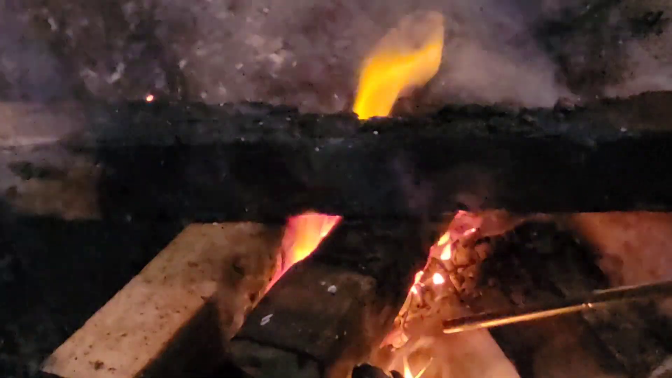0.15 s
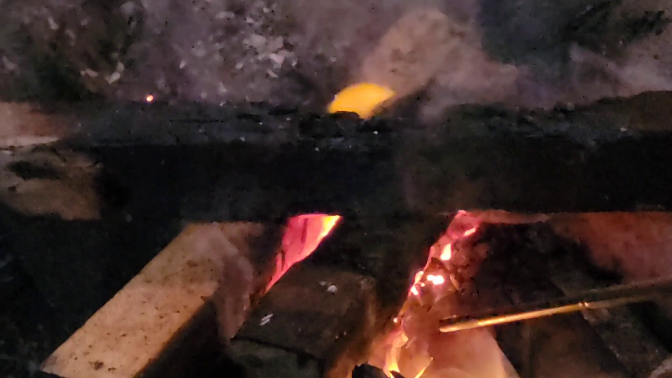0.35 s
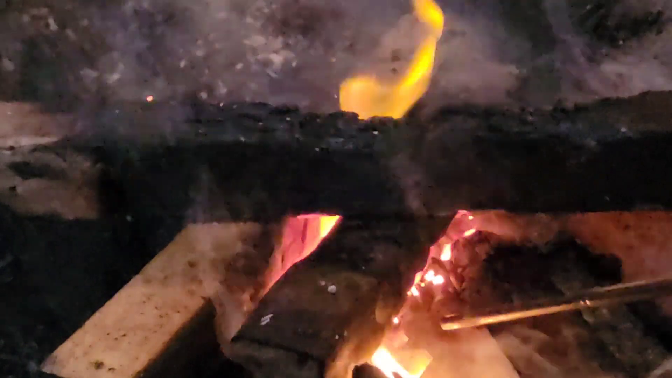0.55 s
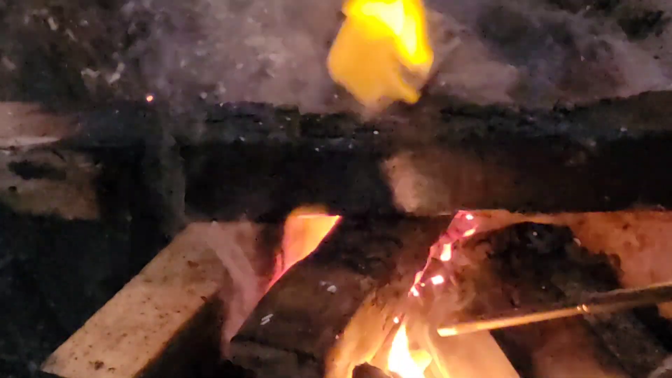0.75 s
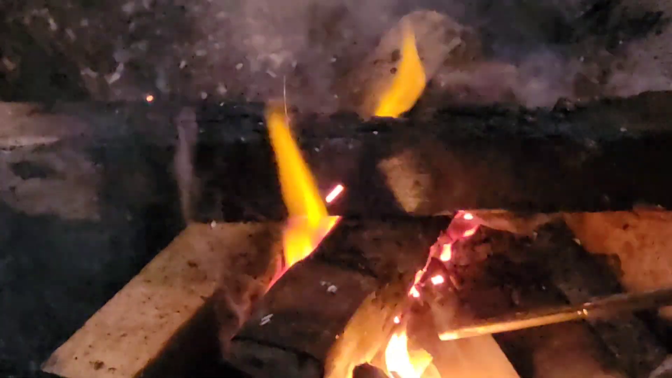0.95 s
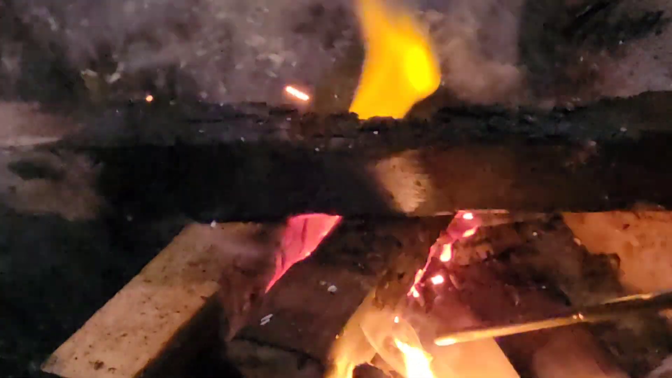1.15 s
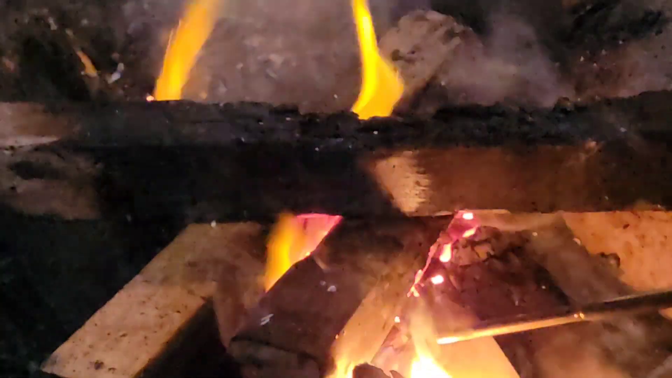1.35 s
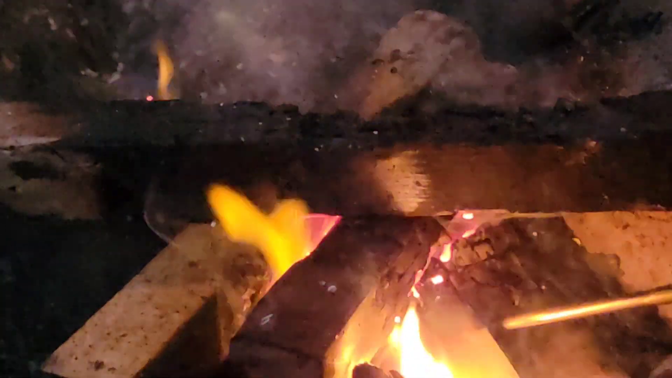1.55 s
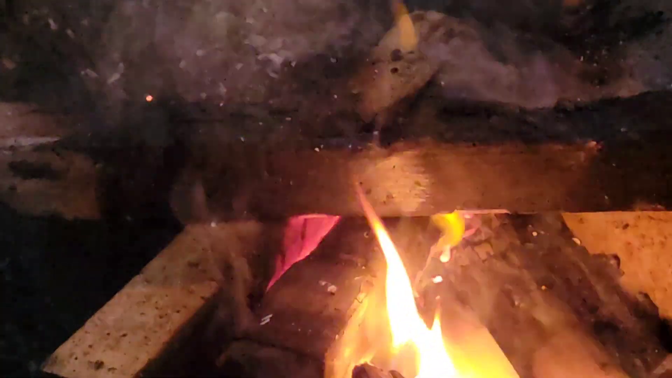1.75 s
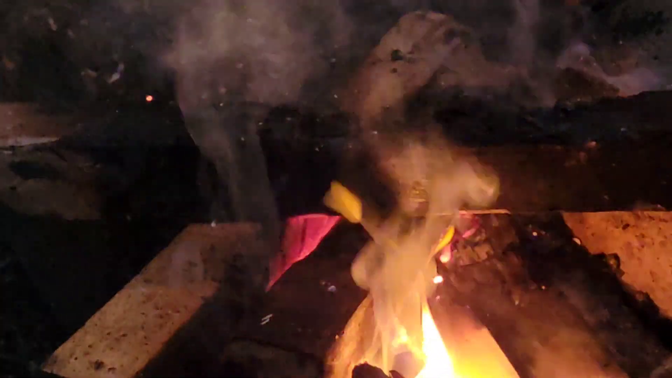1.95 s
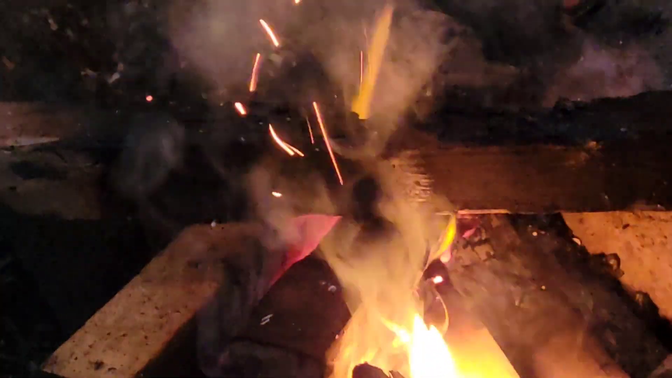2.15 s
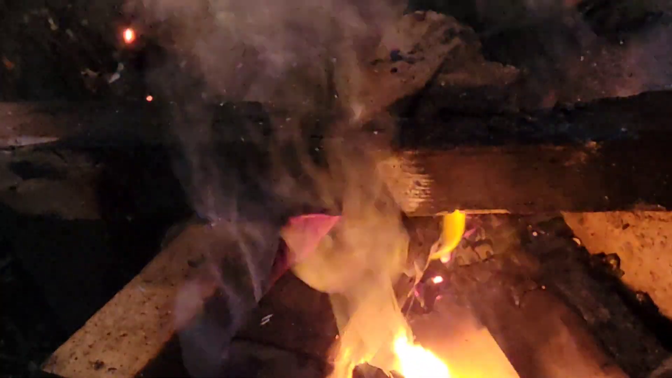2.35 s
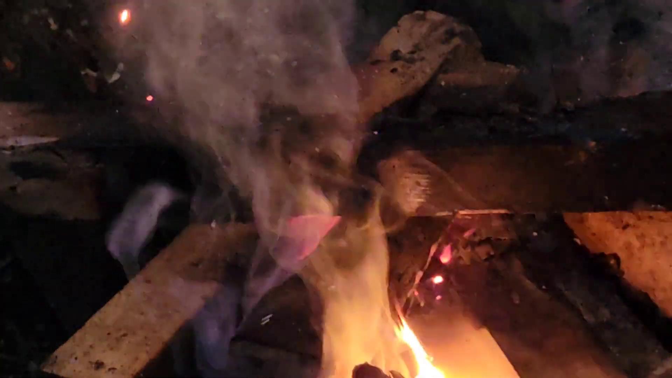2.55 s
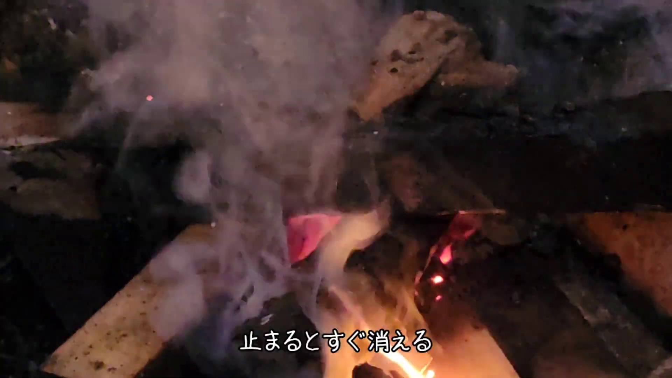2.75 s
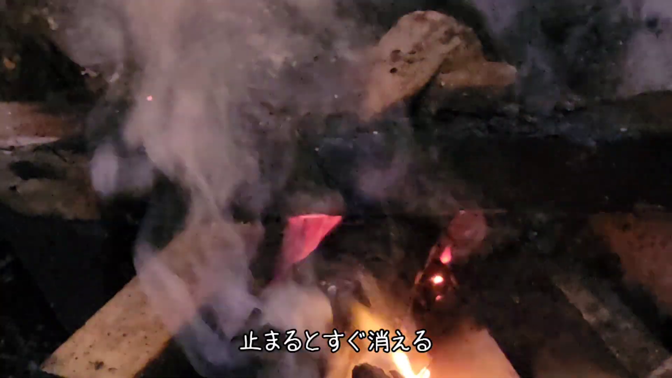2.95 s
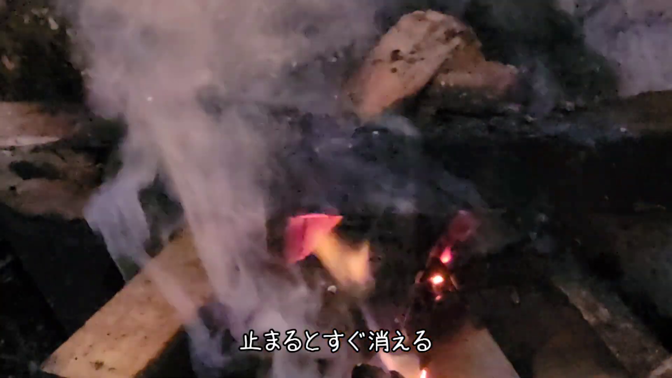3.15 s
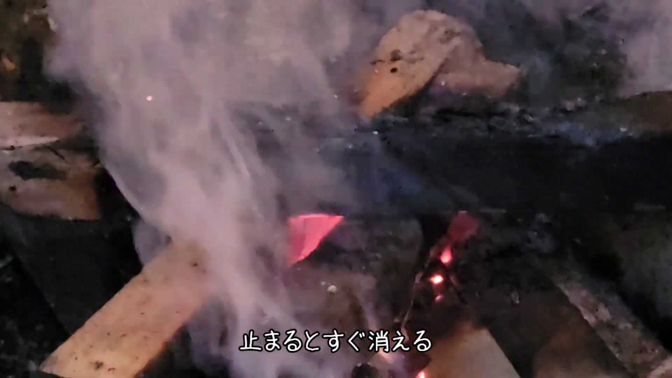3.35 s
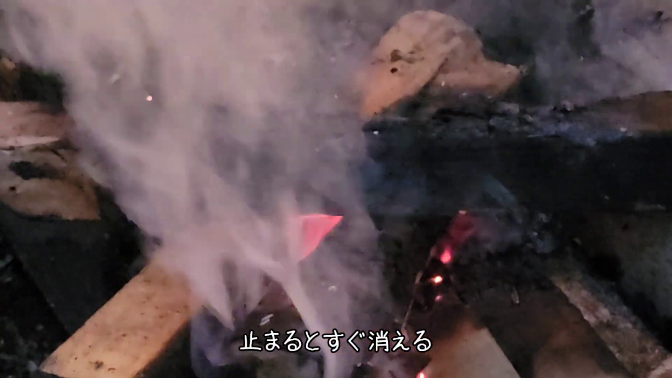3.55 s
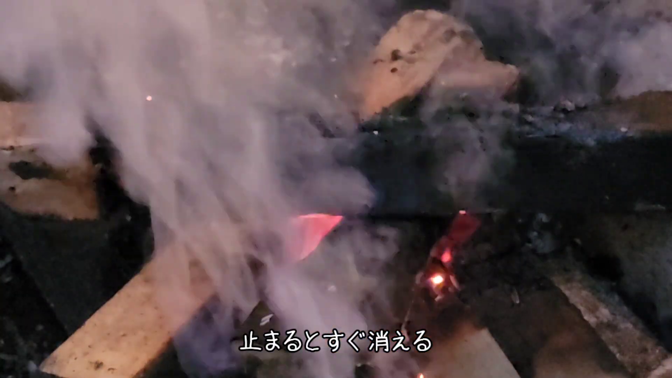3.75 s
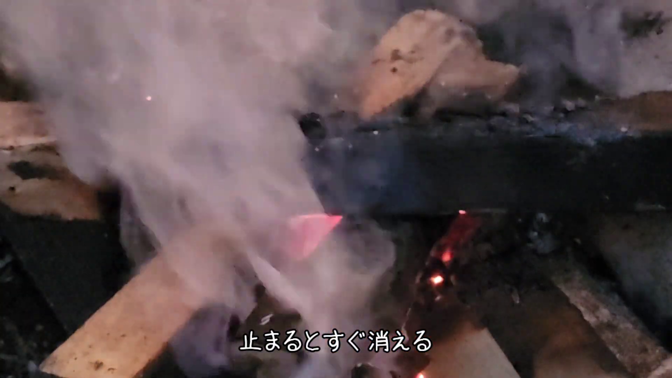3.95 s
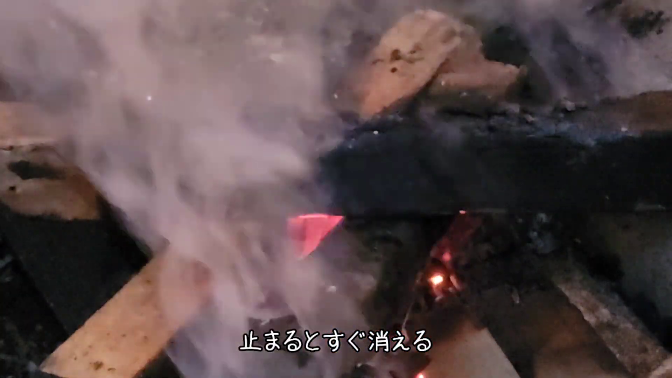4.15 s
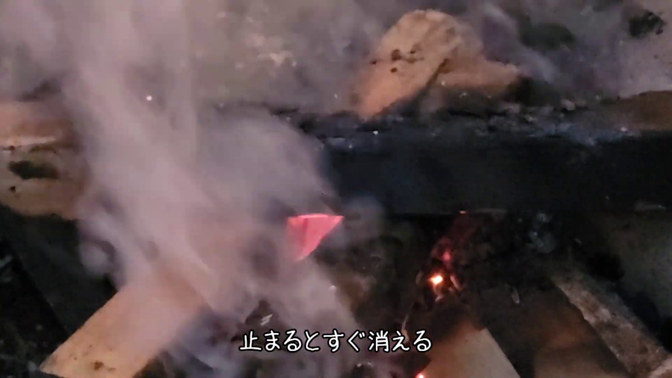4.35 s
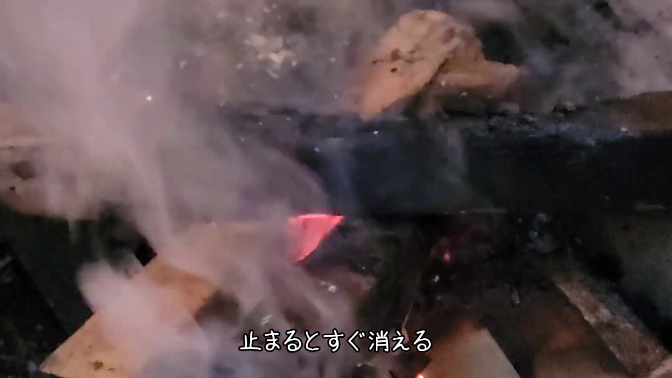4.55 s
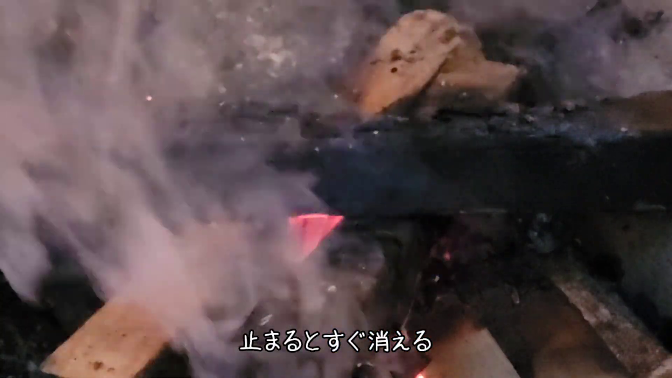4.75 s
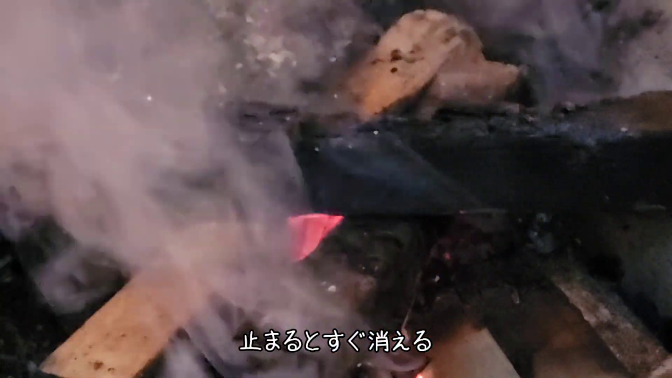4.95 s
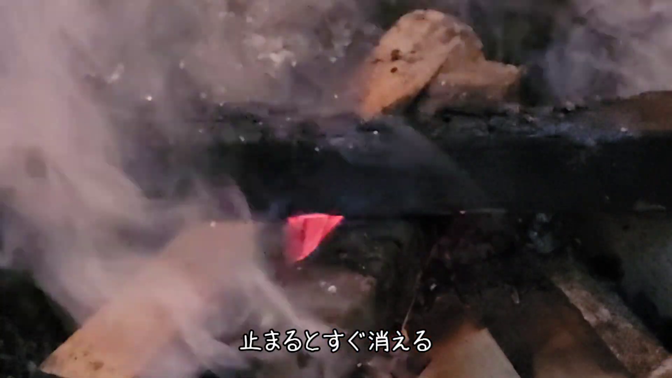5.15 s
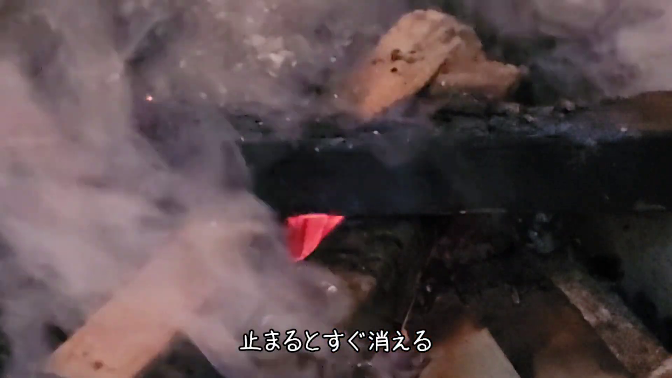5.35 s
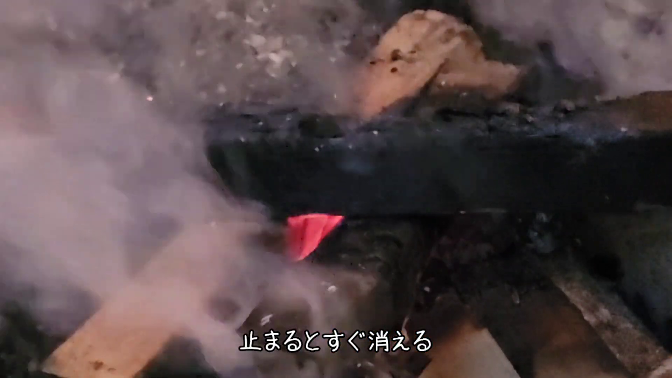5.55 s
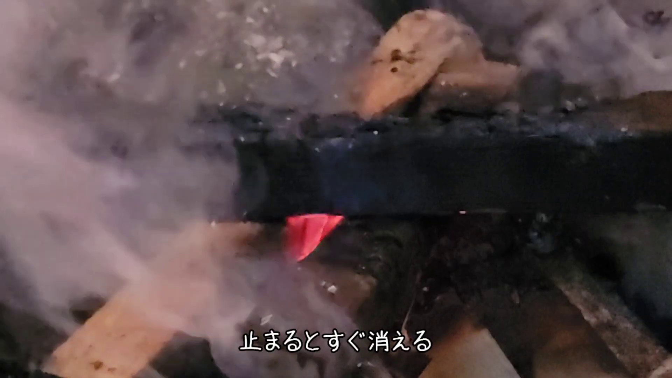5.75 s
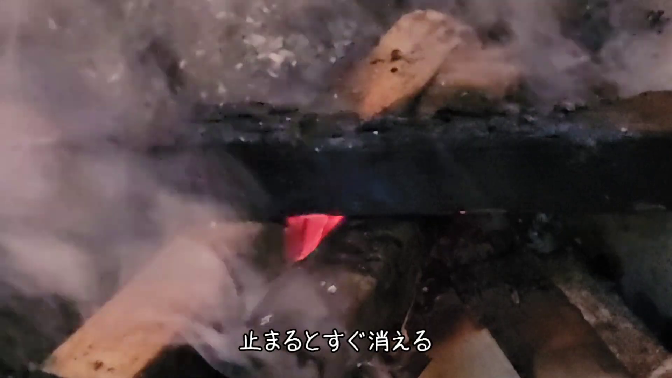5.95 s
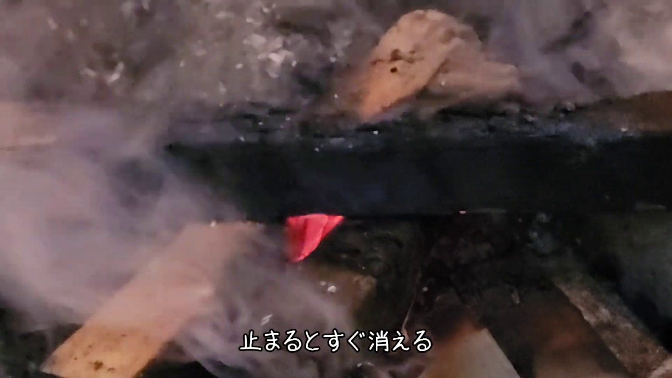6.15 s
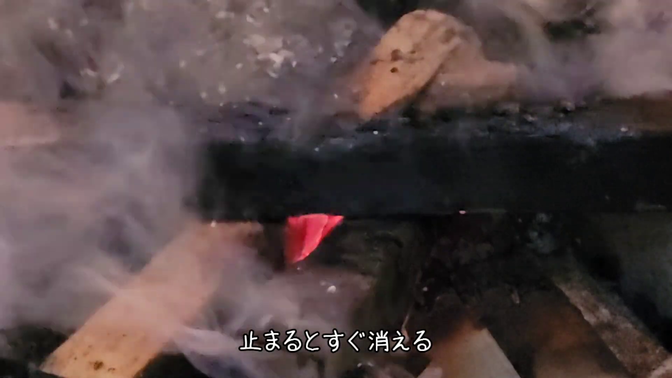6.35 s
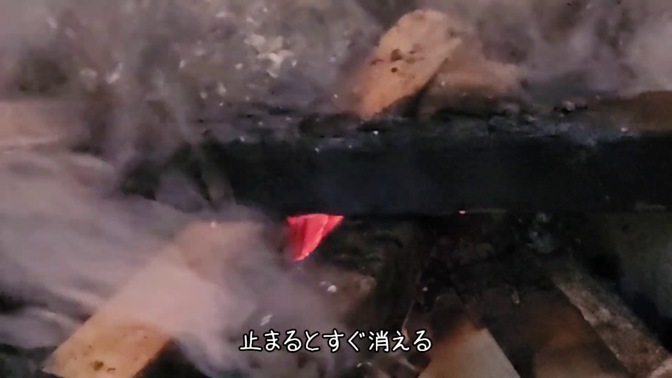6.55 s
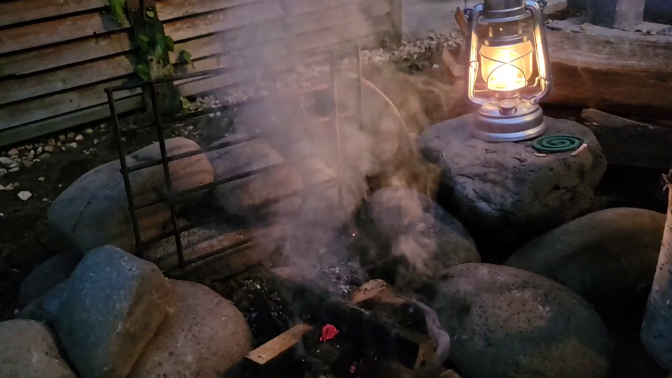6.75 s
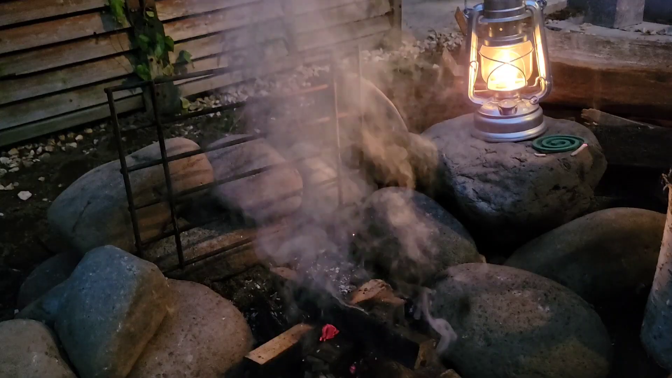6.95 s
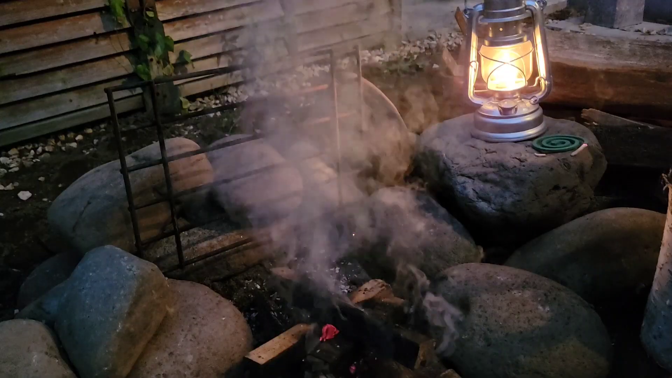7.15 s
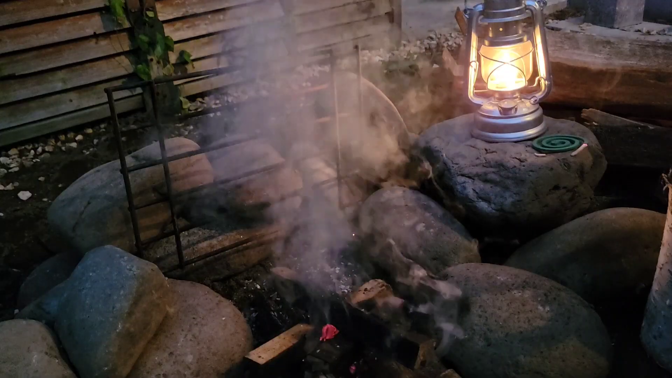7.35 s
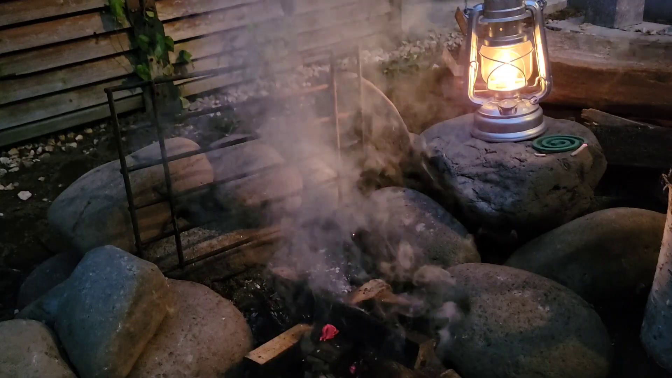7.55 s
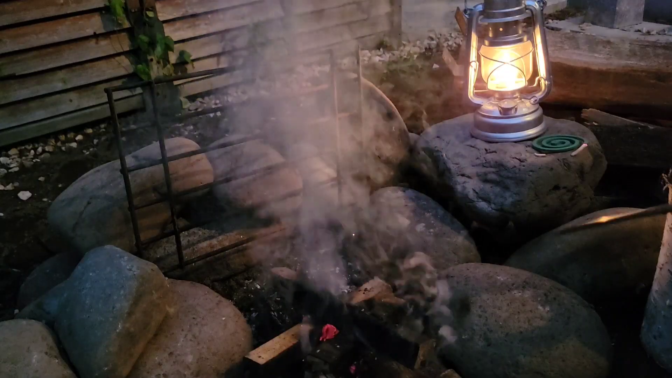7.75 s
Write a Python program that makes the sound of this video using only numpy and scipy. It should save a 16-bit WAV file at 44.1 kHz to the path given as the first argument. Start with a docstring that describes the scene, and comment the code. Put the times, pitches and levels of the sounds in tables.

```python
"""A stone hearth in a yard on a summer night: a small wood fire in front of the microphones, insects all round.
Fanned through a blowpipe, the flames are patchy low noise that flutters, flares up and sinks to a smoulder.
Logs knock, embers tick as ringing splits, and three loud pops are spikes with a rattle and an answer from the yard.
A field cricket chirps close by in sagging pure notes; others and a bush cricket's noisy rasp are farther off.
Near the end the low rumble drops away and the metal pipe scrapes briefly, ringing its resonances."""
import sys
import numpy as np
from scipy import signal
from scipy.fft import rfft, irfft, next_fast_len
from scipy.io import wavfile
from scipy.ndimage import uniform_filter1d, map_coordinates

SR = 44100
rng = np.random.default_rng(int(sys.argv[2]) if len(sys.argv) > 2 else 0)


def file_out(sig):
    """Save sig as 16-bit WAV at sys.argv[1]."""
    # one column per channel
    cols = np.atleast_2d(sig).T
    # limit, then scale
    lim = np.clip(cols, -1, 1)
    pcm = np.round(lim * 32767).astype(np.int16)
    wavfile.write(sys.argv[1], SR, pcm)


N = 343539

# How strongly the fire burns. Each row: time in seconds, level over a smoulder in dB.
BLAZE = [(0, 2.5), (.35, 4.5), (.7, 4), (1.1, 3.5), (1.42, 5.5), (1.7, 1.5), (2.8, 2)]
# Flare-ups as fresh air feeds the flames. Each row: centre in seconds, level in dB, half-length in seconds.
FLARES = [(0.058, -47.5, 0.043), (0.25, -51, 0.16), (0.943, -46, 0.053), (1.286, -48, 0.1),
          (1.494, -41, 0.064)]
# Loud pops. Each row: start in seconds, level in dB, t60 of the rattle among the logs in seconds,
# yard echo gain in dB, left-right level difference in dB.
POPS = [(0.8355, -15, 0.0091, -22, -1), (1.9796, -13.5, 0.012, -13.5, -0.5), (5.1343, -21, 0.012, -24.5, 0)]
# The colour of each pop, one list per pop. Each row: frequency in Hz, relative level in dB.
POP_COLOURS = [
    [(80, -9), (240, 3), (420, -7), (750, -6), (1300, -3), (1700, -2), (2050, -11), (3000, -3.5),
     (4200, -1), (5200, -5.5), (6200, -3.5), (9800, -13), (12000, -5), (15500, -11.5)],
    [(80, -9), (240, 5.5), (440, -6), (850, -6), (1180, 2.5), (1600, -0.5), (1900, -3.5), (2500, 0),
     (3500, -1.5), (4300, -8.5), (5600, -4.5), (7500, -14.5), (12500, -11.5), (15500, -17)],
    [(80, -17), (200, 2), (460, -11), (950, -8.5), (1300, 1), (1750, -1), (2080, -24), (2750, -0.5),
     (3700, -0.5), (4500, -14), (5300, -14.5), (7300, -9), (8500, -12.5), (11000, -22.5)],
]
# The clearest ticks: the embers, and at 7.437 s the click of the blowpipe closing. Each row: start in seconds,
# peak in dB before echo and pan, pitch in Hz.
TICKS = [(.618, -27.5, 9850), (.955, -35.5, 10500), (1.2508, -32.5, 2200), (1.2516, -29, 7850),
         (1.398, -40, 8800), (2.028, -42, 6000), (2.888, -42, 9200), (4.1833, -35, 6200),
         (4.213, -40, 2470), (7.437, -38, 4100)]
# Dull knocks of shifting wood. Each row: start in seconds, starting level in dB, t60 in seconds.
WOOD_KNOCKS = [(1.754, -37.5, 0.066), (2.535, -40.5, 0.23), (2.555, -42, 0.086)]
# Resonances of the metal blowpipe. Each row: frequency in Hz, width in Hz, relative level in dB.
PIPE_MODES = [(2170, 120, -9), (2740, 35, -3), (3486, 34, 4), (3700, 120, -8), (4270, 21, 5), (5012, 25, 2),
              (5550, 22, 5.5), (6400, 65, -13), (7820, 120, -7), (10700, 900, -27)]

# Runs of evenly spaced cricket chirps: the near one, a lower one farther off, a higher one.
# Each row: start in seconds, chirps, period in seconds, syllables, first level in dB, dB gained per chirp;
# the near cricket is later mixed 3.5 dB lower.
NEAR_CHIRPS = [(-.025, 7, .319, 5, -44.3, 0.3), (2.25, 5, .322, 4, -40.5, -1),
               (3.815, 7, .322, 4, -45, 0.12), (6.415, 2, .303, 4, -44.3, -3.5)]
LOW_CHIRPS = [(.24, 4, .33, 4, -48.5, -1.6), (2.16, 1, .32, 1, -51.5, 0), (3.15, 7, .312, 3, -52.5, 0),
              (5.66, 1, .32, 4, -56.5, 0), (6.32, 2, .36, 3, -57.5, 9)]
HIGH_CHIRPS = [(6.917, 3, .421, 3, -63.5, 3.5)]
# The bush cricket's runs of evenly spaced bursts. Each row: start in seconds, bursts, period in seconds,
# burst length in seconds, first level in dB before roughness and pan, dB gained per burst.
RASP_BURSTS = [(.13, 3, 0.46, 0.4, -65, 3.5), (1.67, 2, 0.35, 0.27, -62, 2.5),
               (2.3, 5, 0.55, 0.38, -57, -1), (5.55, 4, .42, 0.19, -67.5, -.5)]

# Spectra of flames, flares, wood, insects, rumble, air and hiss, and the colouring of the pops' echo.
# Each row: frequency in Hz, relative level in dB.
FLUTTER_COLOUR = [(70, -40), (130, -3), (200, -1), (290, -3), (400, -8.5), (600, -18), (1500, -43.5)]
FLARE_COLOUR = [(90, -34), (140, -4.5), (180, 3), (240, -2.5), (300, -6.5), (400, -13), (900, -55)]
WOOD_COLOUR = [(80, -39), (220, 6), (400, 2.5), (800, 0), (1300, -18), (3000, -17), (9000, -30.5)]
RASP_COLOUR = [(6000, -34), (9000, 2.5), (11000, 5), (12300, 10), (13400, 8.5), (15200, 4), (16000, 2.5)]
CHORUS_COLOUR = [(4200, -24), (4750, -7.5), (5000, 5.5), (5200, 7.5), (5380, 5.5), (5600, -42), (6200, -51)]
RUMBLE_COLOUR = [(15, -11), (30, -6.5), (45, -2.5), (68, 2), (100, 3), (125, -5), (170, -16), (300, -63)]
AIR_COLOUR = [(250, -19.5), (430, -3), (700, -2.5), (1100, -4.5), (1500, -15), (2500, -28.5)]
HISS_COLOUR = [(700, -32), (1400, 3), (2200, 0.5), (3000, -1), (4000, -8), (5500, -5), (7000, -16.5),
               (8000, -11), (8550, -5.5), (9200, -16), (11000, -19), (15500, -30)]
ECHO_COLOUR = [(100, -6), (300, 2), (700, 5.5), (2500, 8.5), (5000, 9), (9000, 11.5), (15000, 5.5)]
# Likeness of left and right in the noise layers. Each row: frequency in Hz, correlation from -1 to 1.
LIKENESS = [(60, 0.97), (130, 0.97), (290, 0.9), (640, 0.24), (1400, -0.064), (3100, 0.37), (6800, -0.32),
            (15000, 0.14)]
# Dying away of the yard's reflections. Each row: frequency in Hz, t60 in seconds.
YARD_T60 = [(200, 0.24), (2500, 0.27), (6000, 0.26), (14000, 0.18)]

# Levels in dB, each with its drop in dB at the hush; a negative drop is a rise.
SMOULDER_DB, SMOULDER_DROP_DB = -56, 6
CHORUS_DB, CHORUS_DROP_DB = -60.5, 4.5
RUMBLE_DB, RUMBLE_DROP_DB = -49.5, 7
AIR_DB, AIR_DROP_DB = -58, -0.3
HISS_DB, HISS_DROP_DB = -59, 4
HUSH_S, HUSH_FADE_S = 6.94, 0.021  # middle of the fall, and its time constant
RUMBLE_DRIFT_DB, RUMBLE_DRIFT_RATE = -0.15, 3.07  # dB per unit of a tiny chance drift, knots a second
HISS_GROWS, AIR_GROWS, FAINT_GROWS = 0.91, 0.47, 2.2  # dB per dB of blaze
FAINT_DB, FAINT_RANGE_DB = -59.5, 8.5  # weakest chance tick before the blaze lifts it, and the spread above
FAINT_LOW_HZ, FAINT_RANGE_HZ = 8000, 5000  # lowest pitch of the chance ticks, and the spread above
TOP_HZ = 15700  # upper band limit of the recorder


def flames():
    """Turbulent flames flutter in quick lumps and flare up with a soft low whump."""
    t = np.arange(N) / SR
    burn_db = SMOULDER_DB + blaze() - SMOULDER_DROP_DB * hush()
    flutter = gain(1.57 * wobble(22)) * rush(FLUTTER_COLOUR, patchy_db=-0.5)
    burn = gain(burn_db) * unit(flutter)
    swell = sum(gain(db) * np.exp(-((t - s) / half) ** 2) for s, db, half in FLARES)
    return burn + swell * rush(FLARE_COLOUR, patchy_db=-1.5)


def blaze():
    """The strength of the fire at each sample, in dB over a smoulder."""
    s, db = np.transpose(BLAZE)
    return np.interp(np.arange(N) / SR, s, db)


def pops():
    """Pockets of steam burst the wood open and the yard answers."""
    out = np.zeros((2, N))
    for (s, db, t60, echo_db, pan_db), colour in zip(POPS, POP_COLOURS):
        crack = coloured(snap(t60, scatter=2.04, apart=0.81), colour)
        # the level spreads the whole energy over a nominal 4.8 ms
        crack = gain(db) * crack * np.sqrt(2 * 0.0048 * SR / np.sum(crack ** 2))
        echo = coloured(yard(crack, build_s=.002, lumpy_db=4.5), ECHO_COLOUR)
        add(out, s, (crack + gain(echo_db) * echo) * panned(pan_db))
    return out


def snap(t60, scatter, apart):
    """One pressure spike and its dense scatter off the logs, partly different left and right; even in spectrum."""
    t = np.arange(SR // 2) / SR
    shared = rng.standard_normal(len(t))
    noise = shared + apart * rng.standard_normal((2, len(t)))
    rattle = noise * gain(-60 * t / t60) * (1 - np.exp(-t / 0.00034))
    burst = (t == 0) + scatter * rattle / np.linalg.norm(rattle[0])
    # undo the smoothed spectrum of the burst
    hz = np.fft.rfftfreq(len(t), 1 / SR)
    power = uniform_filter1d(np.abs(rfft(burst)) ** 2, size=120, axis=1)
    ripple_db = 10 * np.log10(power + 1e-6)
    evened = [coloured(side[None], np.column_stack([hz, -db])) for side, db in zip(burst, ripple_db)]
    return np.vstack(evened)


def embers():
    """Tiny splits in the charcoal, and the blowpipe's closing click, each with one broad resonance; fainter
    ticks at random, stronger in the blaze."""
    out, blaze_db = np.zeros((2, N)), blaze()
    faint = []
    for when, size, pitch in rng.random(size=(30, 3)):
        db = FAINT_DB + FAINT_RANGE_DB * size + FAINT_GROWS * blaze_db[int(when * N)]
        faint.append((when * N / SR, db, FAINT_LOW_HZ + FAINT_RANGE_HZ * pitch))
    for s, db, hz in TICKS + faint:
        split = snap(t60=.012, scatter=2.8, apart=.9)
        tick = filtered(split, lambda f: resonance(f, hz, .6 * hz) ** 2)
        add(out, s, gain(db) * tick / np.abs(tick).max())
    echo = yard(out, build_s=.004, lumpy_db=2)
    return (out + gain(-11) * echo) * panned(-2.5)


def knocks():
    """Logs settle with short dull knocks: decaying noise with the colour of wood."""
    out, t = np.zeros((2, N)), np.arange(SR // 4) / SR
    for s, db, t60 in WOOD_KNOCKS:
        noise = rng.standard_normal(len(t)) + .5 * rng.standard_normal((2, len(t)))
        body = unit(coloured(noise, WOOD_COLOUR))
        add(out, s, gain(db - 60 * t / t60) * body)
    return out


def blowpipe(s, db, rub_s, t60):
    """A short scrape of metal rings the tube's resonances."""
    out, t = np.zeros((2, N)), np.arange(SR // 2) / SR
    rub = rng.standard_normal((2, len(t))) * gain(-60 * np.maximum(t - rub_s, 0) / t60)

    def tube(f):
        """The narrow modes over one broad resonance, dulled at the top by the soft contact."""
        modes = sum(gain(level) * resonance(f, hz, width) for hz, width, level in PIPE_MODES)
        return (modes + 0.29 * resonance(f, 3300, 1500)) / (1 + 1j * f / 7000)

    ring = filtered(rub, tube)
    add(out, s, gain(db) * ring / np.abs(ring).max())
    return out * panned(-1.8)


def insects():
    """A near cricket with a fainter neighbour chirping in step, two independent ones, a far chorus and the bush
    cricket."""
    near = cricket(NEAR_CHIRPS, hz=5170, sag_hz=154, rate=32, stroke_s=.028,
                   swell_db=6.5, lead_db=-8, echo_db=0.5, pan_db=-2.5)
    # a neighbour chirping in step with it, lower, farther off and mostly echo
    neighbour = cricket(NEAR_CHIRPS, hz=5080, sag_hz=480, rate=34, stroke_s=.02,
                        swell_db=-2, lead_db=-4, echo_db=15, pan_db=-1.5)
    low = cricket(LOW_CHIRPS, hz=5070, sag_hz=420, rate=31, stroke_s=.022,
                  swell_db=4, lead_db=-8, echo_db=15, pan_db=-1)
    high = cricket(HIGH_CHIRPS, hz=6250, sag_hz=200, rate=54, stroke_s=0.021,
                   swell_db=-1, lead_db=-20, echo_db=1, pan_db=-1)
    chorus = gain(CHORUS_DB - CHORUS_DROP_DB * hush()) * rush(CHORUS_COLOUR, patchy_db=-1.0)
    near_pair = near + gain(-8.5) * neighbour
    return gain(-3.5) * near_pair + low + high + chorus + bush_cricket(edge_s=0.053, rough_db=1.1)


def cricket(chirps, hz, sag_hz, rate, stroke_s, swell_db, lead_db, echo_db, pan_db):
    """Each wing stroke holds a pure note, then sags and fades as the wing slows; a softer stroke leads in."""
    out = np.zeros((2, N))
    u = np.linspace(0, 1, round(stroke_s * SR))  # progress through one stroke
    shape = np.abs(np.sin(np.pi * u)) ** .7
    for s, count, db in repeats(chirps):
        chirp = np.zeros(SR // 2)
        count = max(round(count), 1)
        for k, (late, size, detune) in enumerate(rng.standard_normal((count + 1, 3))):
            pitch = hz + 12 * detune - sag_hz * u ** 3
            note = np.sin(2 * np.pi * np.cumsum(pitch) / SR)
            stroke_db = swell_db * k / count + size + lead_db * (k == 0)
            add(chirp, k / rate + .001 * late, gain(stroke_db) * shape * note)
        heard = chirp + gain(echo_db) * yard(chirp, build_s=0.0031, lumpy_db=-1)
        level = np.sqrt(2 * count / rate * SR / np.sum(heard ** 2))
        add(out, s - 1 / rate, gain(db) * heard * level)  # early by the lead-in stroke
    return out * panned(pan_db)


def bush_cricket(edge_s, rough_db):
    """Bursts of a dry, very high rasp: rough noise that fades in and out."""
    t = np.arange(N) / SR
    bursts = 0
    for s, length, db in repeats(RASP_BURSTS):
        window = (np.tanh((t - s) / edge_s) - np.tanh((t - s - length) / edge_s)) / 2
        bursts = bursts + gain(db) * window
    return bursts * gain(rough_db * wobble(90)) * rush(RASP_COLOUR, patchy_db=0.8) * panned(-1.5)


def repeats(runs):
    """Spell out each run as rows (start, length or syllables, dB), one per repeat; the level drifts evenly."""
    return [(start + k * period, length, db + k * drift_db)
            for start, count, period, length, db, drift_db in runs
            for k in range(round(count))]


def night():
    """A nearly steady rumble, the murmur of the air and a soft hiss; murmur and hiss rise with the blaze."""
    blaze_db, quiet = blaze(), hush()
    rumble_db = RUMBLE_DB + RUMBLE_DRIFT_DB * wobble(RUMBLE_DRIFT_RATE) - RUMBLE_DROP_DB * quiet
    air_db = AIR_DB + AIR_GROWS * blaze_db - AIR_DROP_DB * quiet
    hiss_db = HISS_DB + HISS_GROWS * blaze_db - HISS_DROP_DB * quiet
    rumble = gain(rumble_db) * rush(RUMBLE_COLOUR, patchy_db=0.5)
    air = gain(air_db) * rush(AIR_COLOUR, patchy_db=1.8)
    hiss = gain(hiss_db) * rush(HISS_COLOUR, patchy_db=2.0)
    return rumble + air + hiss


def hush():
    """Goes from 0 to 1 as the background falls quieter."""
    return (1 + np.tanh((np.arange(N) / SR - HUSH_S) / HUSH_FADE_S)) / 2


def yard(x, build_s, lumpy_db):
    """The answer of stones and fence: many uneven reflections that build up, then die at a rate set by pitch."""
    hz, t, z = signal.stft(rng.standard_normal((2, SR // 2)), SR, nperseg=256)
    decay = gain(-60 * t / along(YARD_T60, hz)[:, None])
    tail = signal.istft(z * decay, SR, nperseg=256)[1]
    lumps = unit(uniform_filter1d(rng.standard_normal(tail.shape[1]), size=48))
    build = 1 - np.exp(-np.arange(tail.shape[1]) / SR / build_s)
    tail = tail * gain(lumpy_db * lumps) * build
    return signal.fftconvolve(np.atleast_2d(x), tail / np.linalg.norm(tail[0]), axes=1)[:, :x.shape[-1]]


def rush(spectrum, patchy_db):
    """Stereo noise of rms 1 with patches of random gain, most alike left and right in the bass."""
    z = signal.stft(rng.standard_normal((2, N)), nperseg=512)[2]
    field = uniform_filter1d(rng.standard_normal(z.shape[1:]), size=6, axis=0)  # across frequency
    field = uniform_filter1d(field, size=14, axis=1)  # along time
    pair = signal.istft(z * gain(patchy_db * unit(field)), nperseg=512)[1][:, :N]

    def shares(hz):
        """Mid and side gains that give the wanted likeness and spectrum."""
        turn = np.arccos(np.clip(along(LIKENESS, hz), -1, 1)) / 2
        return gain(along(spectrum, hz)) * [np.cos(turn), np.sin(turn)]

    mid, side = filtered(pair, shares)
    return unit(np.array([mid + side, mid - side]))


def resonance(f, hz, width):
    """Response of one damped mode."""
    return 1j * f * width / (hz * hz - f * f + 1j * f * width)


def coloured(x, spectrum, size=2048):
    """x through a causal minimum-phase filter with the given (Hz, dB) shape."""
    cepstrum = irfft(np.log(gain(along(spectrum, np.fft.rfftfreq(size, 1 / SR)))))
    cepstrum[1:size // 2] *= 2  # folding the cepstrum forward makes it causal
    cepstrum[size // 2 + 1:] = 0
    impulse = irfft(np.exp(rfft(cepstrum)))
    return signal.fftconvolve(x, impulse[None], axes=1)[:, :x.shape[1]]


def filtered(x, response):
    """x times a complex response of frequency."""
    n = x.shape[-1]
    m = next_fast_len(n + SR // 4)
    return irfft(rfft(x, m) * response(np.fft.rfftfreq(m, 1 / SR)), m)[..., :n]


def along(points, hz):
    """(Hz, value) points read on a log axis."""
    f, v = np.transpose(points)
    return np.interp(np.log(hz + 1), np.log(f + 1), v)


def wobble(rate):
    """A smooth random curve, rate knots a second."""
    knots = rng.standard_normal(int(N * rate / SR) + 4)
    return map_coordinates(knots, [np.arange(N) * rate / SR])


def gain(db):
    """Decibels to gain."""
    return 10 ** (np.asarray(db) / 20)


def unit(x):
    """x at rms 1."""
    return x / np.sqrt(np.mean(x ** 2) + 1e-20)


def panned(pan_db):
    """Left and right gains for a level difference; negative leans right."""
    return gain([[pan_db / 2], [-pan_db / 2]])


def add(track, s, sound):
    """Mix a sound into a track at time s, trimming what falls outside."""
    start = max(round(s * SR), 0)
    sound = sound[..., max(-round(s * SR), 0):]
    part = track[..., start:start + sound.shape[-1]]
    part += sound[..., :part.shape[-1]]


def scene():
    """The fire in front, the night all round."""
    bed = (flames() + night()) * panned(-0.67)
    fire = pops() + embers() + knocks()
    scrape = blowpipe(s=7.213, db=-31, rub_s=0.023, t60=0.23)
    return bed + fire + scrape + insects()


def record(dry):
    """The recorder rounds off the tallest peaks and cuts steeply above its band limit."""
    rounded = dry / (1 + np.abs(dry) ** 4) ** (1 / 4)
    return filtered(rounded, lambda hz: 1 / (1 + (hz / TOP_HZ) ** 120))


dry = scene()
out = record(dry)
file_out(out)
```